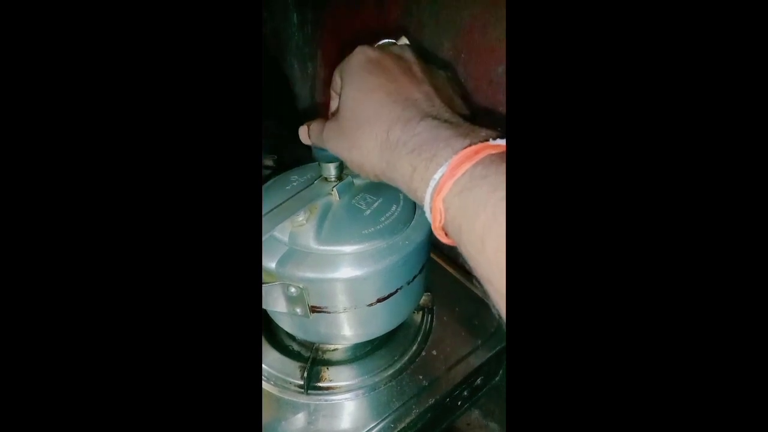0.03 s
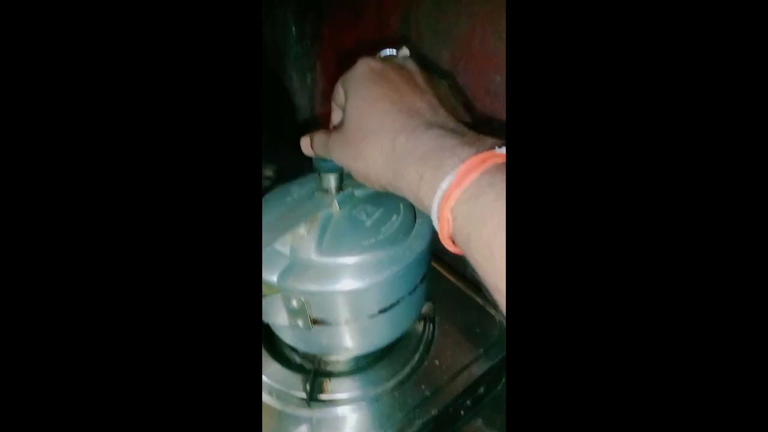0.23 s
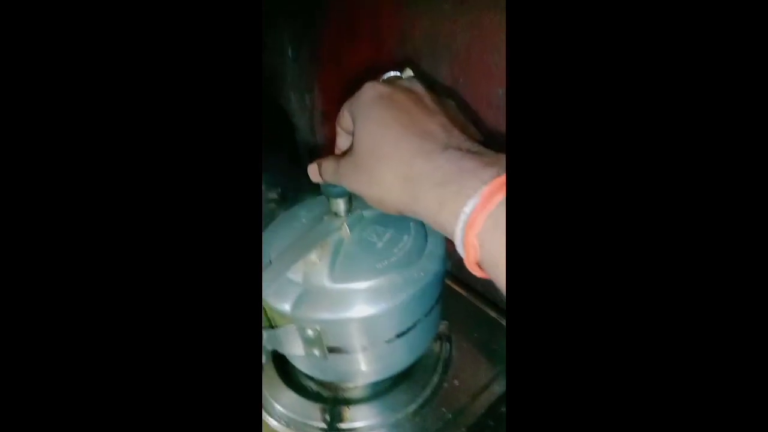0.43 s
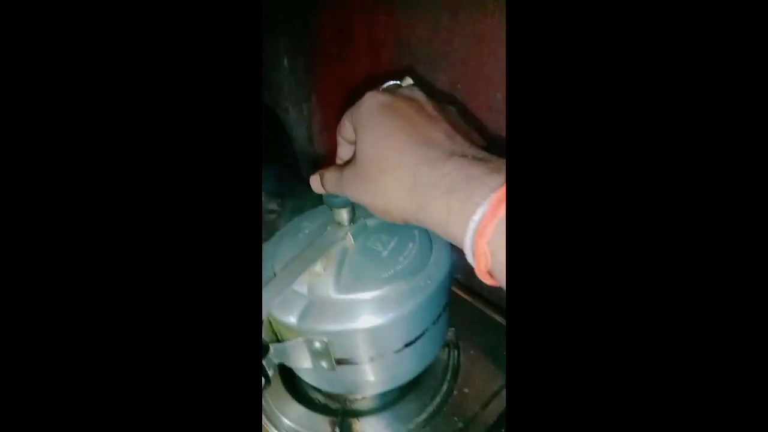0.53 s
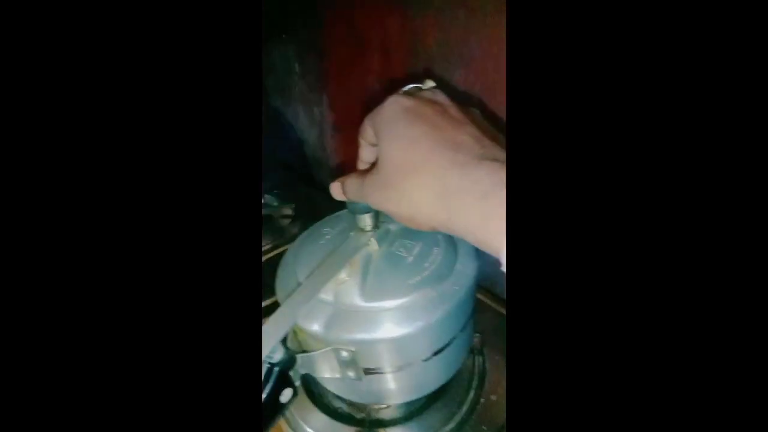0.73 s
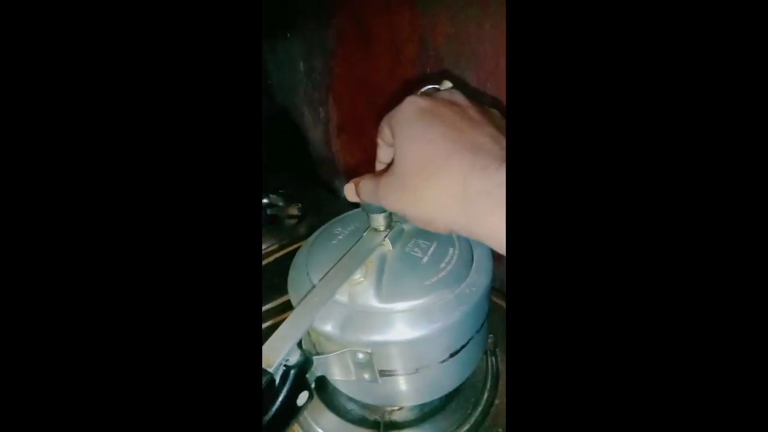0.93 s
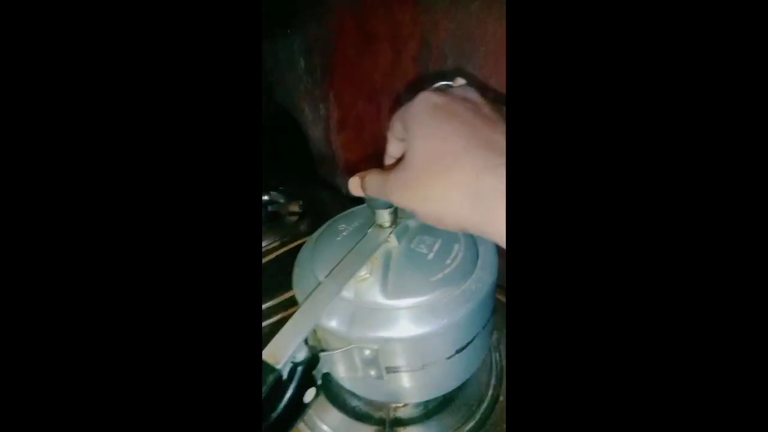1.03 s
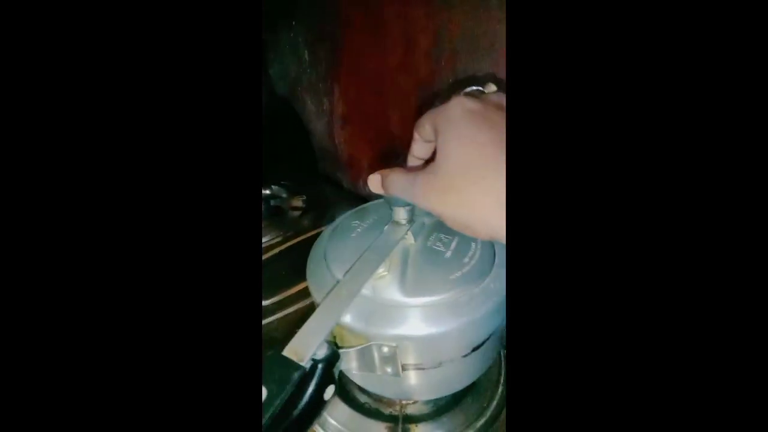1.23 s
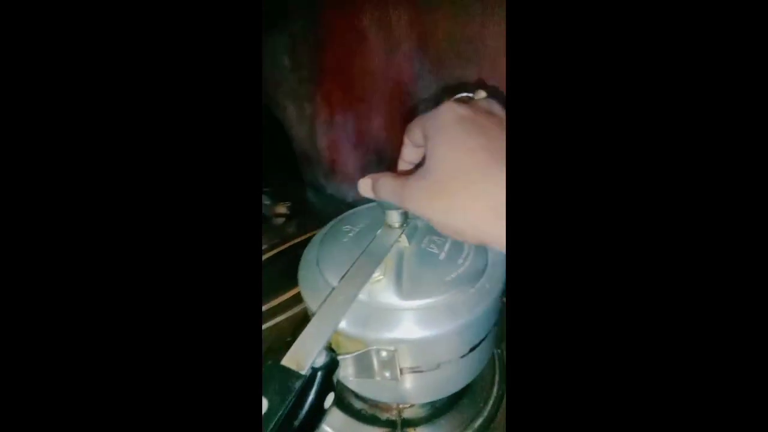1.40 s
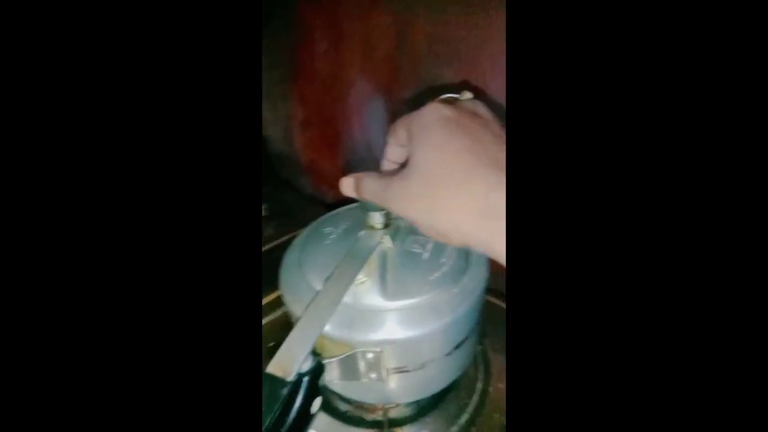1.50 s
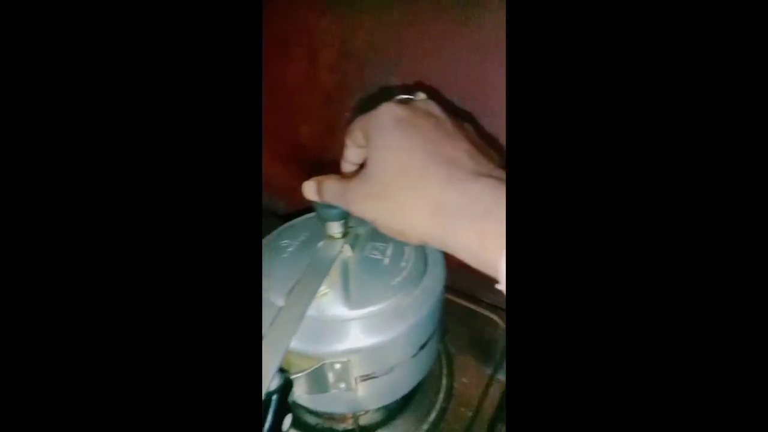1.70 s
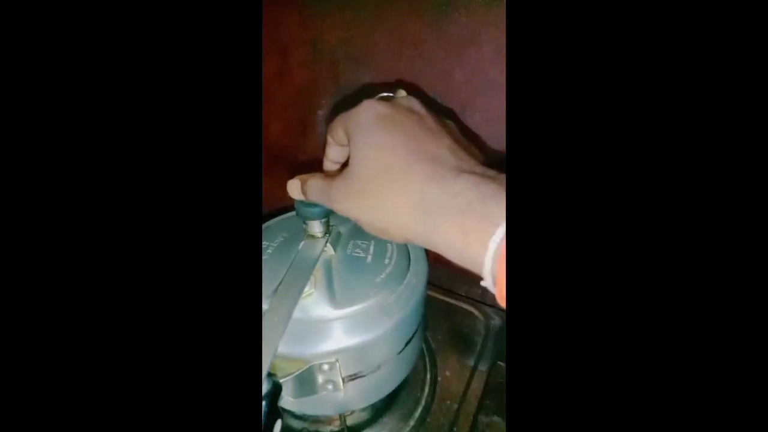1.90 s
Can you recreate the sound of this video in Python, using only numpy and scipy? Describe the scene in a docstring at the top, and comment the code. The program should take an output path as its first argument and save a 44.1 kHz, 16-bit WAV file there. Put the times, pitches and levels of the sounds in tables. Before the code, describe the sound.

A pressure cooker's steam jets out in a loud, bright hiss for about half a second, then the weight rattles back onto its pipe; small handling bumps and a soft metal clunk follow in a quiet kitchen, close microphone.

```python
"""Lifting a pressure-cooker weight

In a small kitchen, one microphone hears a hand lift the weight: filtered noise jets out as steam and dies.
The lid booms and sings as ringing modes and a narrow noise band; the weight rattles back onto its pipe.
A faint leak with wavering sine whistles runs throughout, with two tiny wet noise ticks near the end.
A soft metal clunk, modes over a noise wash, follows; an earlier one is already dying away at the start.
Handling bumps (noise taps with sine thuds), low room noise and a two-tone hum lie underneath.
"""
import sys
import numpy as np
from scipy import signal
from scipy.fft import rfft, irfft, next_fast_len
from scipy.io import wavfile

SR = 44100
rng = np.random.default_rng(int(sys.argv[2]) if len(sys.argv) > 2 else 0)


def generate_wav(signal):
    """Clip the signal to [-1, 1] and save it as 16-bit WAV at the path in sys.argv[1]."""
    frames = np.transpose(np.atleast_2d(signal))
    scaled = np.clip(frames, -1, 1) * 32767
    pcm = np.round(scaled).astype(np.int16)
    wavfile.write(sys.argv[1], SR, pcm)


N = 85995  # length in samples

# Colour of the low room noise: pitch_hz, level_db
ROOM_COLOUR = [(25, -21), (60, -8.5), (120, -6.5), (270, -8), (450, -10.5), (800, -16.5), (1300, -13),
               (2000, -26.5), (5000, -59)]
ROOM_LEVEL_DB = -74
# Tones of the hum: pitch_hz, level_db
HUM_TONES = [(71, -75), (312, -78)]
# Reverberation of the small kitchen: pitch_hz, t60_s
KITCHEN_DECAY = [(150, 0.63), (1000, 0.57), (5000, 0.47), (9000, 0.44), (13000, 0.33)]

# Steam seeping past the seated weight: time_s, level_db
LEAK_LEVEL = [(0, -62.5), (.07, -65.5), (1.101, -63.5), (1.29, -64.5), (1.36, -68.5), (1.6, -64),
              (1.73, -64), (1.84, -69), (1.95, -69.5)]
# Colour of the leak: pitch_hz, level_db
LEAK_COLOUR = [(500, -21.5), (1000, -11), (1300, -2), (1700, -12), (2100, -6.5), (2500, 1.5), (3900, -1.5),
               (5000, -8.5), (5850, -1.5), (7200, -1.5), (8200, -12.5), (10500, -10), (13000, -23.5),
               (15300, -20)]
# Faint whistles in the leak: start_s, end_s, pitch_hz, level_db
LEAK_WHISTLES = [(1.1, 1.37, 4640, -71), (1.168, 1.334, 5840, -65.5), (1.37, 1.643, 5700, -72)]
WHISTLE_WAVER = .018  # share of the pitch
# Droplets spitting at the valve: start_s, level_db
DROPLETS = [(1.286, -58), (1.541, -51)]
# Colour of a droplet: pitch_hz, level_db
DROPLET_COLOUR = [(500, -21.5), (3000, 2), (5000, -8), (12000, -28)]

# Handling bumps: start_s, tap_level_db, thud_level_db, thud_pitch_hz
HANDLING_BUMPS = [(1.055, -40, -42, 150), (1.159, -55, -53, 231), (1.923, -53, -50.5, 151.6)]
# Colour of a tap: pitch_hz, level_db
TAP_COLOUR = [(200, -9.5), (500, -8), (800, -6), (1350, -6.5), (2000, -13), (3500, -20), (9000, -40),
              (14000, -60)]

# Soft clunks, the first begun before time zero: start_s, level_db
METAL_CLUNKS = [(-.13, -49.5), (1.6225, -51.5)]
# Chatter of the metal after each clunk: delay_s, level_db
CLUNK_CHATTER = [(.022, -4), (.05, -3.5), (.085, -10.5), (.125, -11.5)]
# Modes of the first contact only: pitch_hz, level_db, t60_s
TICK_MODES = [(5350, 8, .04), (5650, 2, .04)]
# Modes of the clunking metal: pitch_hz, level_db, t60_s
METAL_MODES = [(301, -11.5, 0.36), (686, -2, .5), (730, -2, .5), (1186, -2, .22), (1267, -4, .3),
               (2420, -10, 0.56), (2719, -10.5, .3), (3600, -11, .3)]
# Colour of the wash over those modes: pitch_hz, level_db
METAL_WASH = [(150, -26), (400, -7), (500, -15.5), (680, -0.5), (950, -10), (1230, -2.5), (1750, -12.5),
              (2700, -9), (3800, -6.5), (5600, -18), (7000, -20.5), (9000, -41.5)]
MUFFLE_DELAY_S, MUFFLE_T60_S = .15, .34  # the hand's extra damping, timed from the clunk

# Blows of the weight rattling onto its pipe: start_s, level_db
WEIGHT_BLOWS = [(.797, -29), (.809, -32.5), (.823, -31.5), (.846, -35), (.88, -39.5), (0.926, -37),
                (.95, -46), (.995, -44.5)]
# Modes of the weight on the lid: pitch_hz, level_db, t60_s
WEIGHT_MODES = [(249.1, -16.5, .45), (398.3, -14, .36), (731.6, -10.5, .3), (785, -14.5, 0.32),
                (914, -6, 0.3), (969, -4.5, 0.2), (1077, -21, .2), (1242, -2, 0.2), (1315, -7.5, 0.12),
                (1413, -5, 0.17)]
# Colour of the noise in each blow: pitch_hz, level_db
WEIGHT_NOISE = [(200, -12.5), (550, -12), (850, -1), (1400, -1), (1800, -6), (4000, -9), (9000, -44)]
# Boom of the lid as the jet breaks out: pitch_hz, level_db, t60_s
BOOM_MODES = [(293.6, -46, 0.81)]
BOOM_START_S = .255
MODE_WAVER_RAD = .95  # scale of the random phase drift in each mode

# Swells of the lid's singing resonance: time_s, level_db
SONG_LEVEL = [(.06, -71), (.21, -56), (.255, -38), (.34, -36), (.43, -44), (.53, -32.5), (.58, -51),
              (.675, -36), (.71, -47), (.77, -42), (.87, -50), (1.1, -70)]
SONG_HZ, SONG_HALF_WIDTH_HZ = 1271, 30  # amplitude halves this far from the centre

# Steam flow through the valve, before the jet's trim: time_s, level_db
VALVE_FLOW = [(.075, -65), (.135, -41.5), (.18, -34), (.235, -26.5), (.265, -16.5), (.3, -16), (.55, -18),
              (.6, -19), (.68, -18), (.74, -24.5), (.79, -29), (.85, -41.5), (.93, -49.5), (1.03, -58.5),
              (1.17, -79)]
# Colour of the jet at full flow: pitch_hz, level_db
JET_COLOUR = [(30, -37.5), (105, -30), (200, -26.5), (290, -27), (350, -28.5), (560, -25), (900, -18.5),
              (1130, -15.5), (1320, -10), (1700, -12.5), (2600, -3.5), (3300, -4.5), (3700, -2.5),
              (4400, -5.5), (5200, -4.5), (7000, -2.5), (7550, -4.5), (8000, -10), (10600, -10.5),
              (12200, -17.5), (13900, -18.5), (14600, -14.5), (15500, -12)]
# Resonances of pot and lid excited by the jet: pitch_hz, width_hz, level_db
POT_RESONANCES = [(3756, 150, -0.5), (6055, 120, -1.5), (6753, 160, 1), (6940, 110, 7), (7350, 70, 3)]
JET_TRIM_DB, POT_MIX_DB = -.5, -5
# Below the knee, treble fades faster: extra dB per dB, one octave above the corner
DULL_CORNER_HZ, DULLING_DB_PER_DB, FLOW_KNEE_DB = 5400, .55, -29

LOW_CUT_HZ, TOP_HZ = 42, 15480  # band limits of the recorder


def amp(db):
    """Turn decibels into gain."""
    return 10 ** (np.asarray(db) / 20)


def unit(x):
    """Scale to an rms of 1."""
    return x / np.sqrt(np.mean(x ** 2) + 1e-20)


def along(points, hz):
    """Read a curve of (Hz, value) points on a log frequency axis."""
    point_hz, value = np.transpose(points)
    return np.interp(np.log(hz + 1), np.log(point_hz + 1), value)


def clock(start=0):
    """Seconds since start, zero before it."""
    return np.maximum(np.arange(N) / SR - start, 0)


def wobble(rate):
    """Random curve through normal knots, rate knots a second."""
    knots = rng.standard_normal(int(N * rate / SR) + 4)
    return np.interp(clock() * rate, np.arange(len(knots)), knots)


def filtered(x, response):
    """Apply a frequency response, zero-padded so the tail does not wrap round."""
    size = next_fast_len(N + SR // 2)
    spectrum = rfft(x, size) * response(np.fft.rfftfreq(size, 1 / SR))
    return irfft(spectrum, size)[:N]


def noise(colour):
    """Coloured noise with an rms of 1."""
    return unit(filtered(rng.standard_normal(N), lambda hz: amp(along(colour, hz))))


def fade(start, t60, attack=0.00029):
    """Envelope of a blow: quick rise, exponential decay (seconds)."""
    t = clock(start)
    return (1 - np.exp(-t / attack)) * amp(-60 * t / t60)


def ring(start, modes):
    """Decaying modes with drifting phase, their levels a little different on each blow."""
    total = 0
    for hz, db, t60 in modes:
        gain = amp(db + rng.standard_normal())
        phase = 2 * np.pi * (hz * clock(start) + rng.random())
        phase = phase + MODE_WAVER_RAD * wobble(45)
        total = total + gain * fade(start, t60) * np.sin(phase)
    return total


def kitchen(x, wet_db):
    """Direct sound plus a decaying noise tail for a small hard room, at equal overall power."""
    hz, t, z = signal.stft(rng.standard_normal(SR // 2), SR, nperseg=256)
    decay = amp(-60 * t / along(KITCHEN_DECAY, hz)[:, None])
    tail = signal.istft(z * decay, SR, nperseg=256)[1]
    wet = signal.fftconvolve(x, tail / np.linalg.norm(tail))[:N]
    return (x + amp(wet_db) * wet) / np.hypot(1, amp(wet_db))


def room_noise():
    """Steady noise weighted to the low end, the bed of the place."""
    return amp(ROOM_LEVEL_DB) * noise(ROOM_COLOUR)


def hum():
    """Low tones whose level and phase waver slowly."""
    total = 0
    for hz, db in HUM_TONES:
        level = amp(db + 1.2 * wobble(8.8))
        total = total + level * np.sin(2 * np.pi * hz * clock() + .4 * wobble(7.2))
    return total


def leak():
    """A thin hiss of seeping steam, its level unsteady."""
    level_db = np.interp(clock(), *np.transpose(LEAK_LEVEL)) + .7 * wobble(19)
    return noise(LEAK_COLOUR) * amp(level_db)


def leak_whistles():
    """Faint tones that swell and vanish, with rapid random pitch waver."""
    total = 0
    for start, end, hz, db in LEAK_WHISTLES:
        progress = np.minimum(clock(start) / (end - start), 1)
        swell = np.sqrt(np.abs(np.sin(np.pi * progress)))
        level = amp(db + 3.3 * wobble(39.9))
        pitch = hz * (1 + WHISTLE_WAVER * wobble(400))
        total = total + level * swell * np.sin(2 * np.pi * np.cumsum(pitch) / SR)
    return total


def spits():
    """Droplets at the valve: tiny wet ticks of fast-decaying noise."""
    return sum(amp(db) * noise(DROPLET_COLOUR) * fade(s, t60=.015) for s, db in DROPLETS)


def bumps():
    """Handling bumps: dull noise taps, each with a short low sine thud."""
    total = 0
    for s, tap_db, thud_db, hz in HANDLING_BUMPS:
        tap = noise(TAP_COLOUR) * fade(s, t60=.03)
        thud = fade(s, t60=.055, attack=.0025) * np.sin(2 * np.pi * hz * clock(s))
        total = total + amp(tap_db) * tap + amp(thud_db) * thud
    return kitchen(total, wet_db=-11.5)


def metal_contact(start):
    """One contact of the metal: a few modes over a dense decaying wash."""
    return ring(start, METAL_MODES) + amp(3) * noise(METAL_WASH) * fade(start, t60=.26)


def clunk():
    """Soft blows on metal with chattering repeats, soon muffled by the hand."""
    total = 0
    for s, db in METAL_CLUNKS:
        blow = ring(s, TICK_MODES) + metal_contact(s)
        for delay, chatter_db in CLUNK_CHATTER:
            blow = blow + amp(chatter_db) * metal_contact(s + delay)
        muffle_db = -60 * clock(s + MUFFLE_DELAY_S) / MUFFLE_T60_S
        total = total + amp(db + muffle_db) * blow
    return kitchen(total, wet_db=-14)


def weight_rattle():
    """The weight drops onto its pipe in quick blows: ringing modes plus a burst of noise."""
    total = 0
    for s, db in WEIGHT_BLOWS:
        modes = amp(-5) * ring(s, WEIGHT_MODES)
        clatter = amp(-.5) * noise(WEIGHT_NOISE) * fade(s, t60=.13)
        total = total + amp(db) * (modes + clatter)
    return kitchen(total, wet_db=-2.5)


def lid_boom():
    """The lid rings in a low decaying mode as the jet breaks out."""
    return kitchen(ring(BOOM_START_S, BOOM_MODES), wet_db=-2.5)


def lid_song():
    """The jet keeps one resonance of the lid ringing in swells: narrow-band noise."""
    def band(hz):
        return 1 / (1 + ((hz - SONG_HZ) / SONG_HALF_WIDTH_HZ) ** 2)
    level_db = np.interp(clock(), *np.transpose(SONG_LEVEL), left=-75, right=-80)
    return unit(filtered(rng.standard_normal(N), band)) * amp(level_db)


def pot_response(hz):
    """Sum of second-order band resonances of pot and lid."""
    return sum(amp(db) * 1j * hz * width / (centre ** 2 - hz ** 2 + 1j * hz * width)
               for centre, width, db in POT_RESONANCES)


def jet():
    """Turbulent steam and pot resonances follow the flow; the treble dulls when flow is weak."""
    flow_s, flow_db = np.transpose(VALVE_FLOW)
    resonances = unit(filtered(rng.standard_normal(N), pot_response))
    steam = noise(JET_COLOUR) + amp(POT_MIX_DB) * resonances
    hz, t, z = signal.stft(steam, SR, nperseg=256)
    octave_height = np.maximum(hz / DULL_CORNER_HZ - 1, 0)[:, None]  # 1 at an octave above the corner
    below_knee_db = np.minimum(np.interp(t, flow_s, flow_db) - FLOW_KNEE_DB, 0)
    dulling = amp(DULLING_DB_PER_DB * octave_height * below_knee_db)
    steam = signal.istft(z * dulling, SR, nperseg=256)[1][:N]
    level_db = np.interp(clock(), flow_s, flow_db, left=-120, right=-120)
    level_db = level_db + .4 * wobble(35) + .5 * wobble(220)  # turbulent flutter
    return kitchen(steam * amp(JET_TRIM_DB + level_db), wet_db=-2)


def scene():
    """Everything at one microphone, from the background to the jet."""
    background = room_noise() + hum()
    valve = leak() + leak_whistles() + spits()
    handling = bumps() + clunk()
    lid = weight_rattle() + lid_boom() + lid_song()
    return (background + valve + handling + lid + jet())[None]


def record(dry):
    """The recorder thins the lowest bass and rolls off steeply at its band limit."""
    def response(hz):
        low_cut = (1j * hz / (LOW_CUT_HZ + 1j * hz)) ** 2
        # The ratio is capped to keep the power finite.
        return low_cut / np.sqrt(1 + np.minimum(hz / TOP_HZ, 1.1) ** 400)
    return filtered(dry[0], response)[None]


dry = scene()
out = record(dry)
generate_wav(out)
```